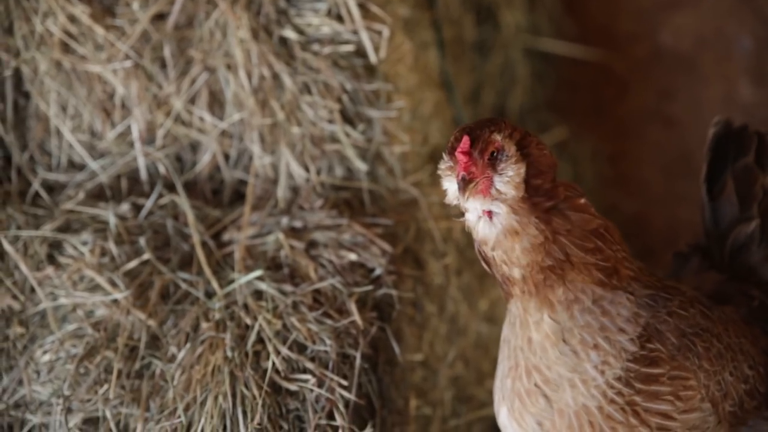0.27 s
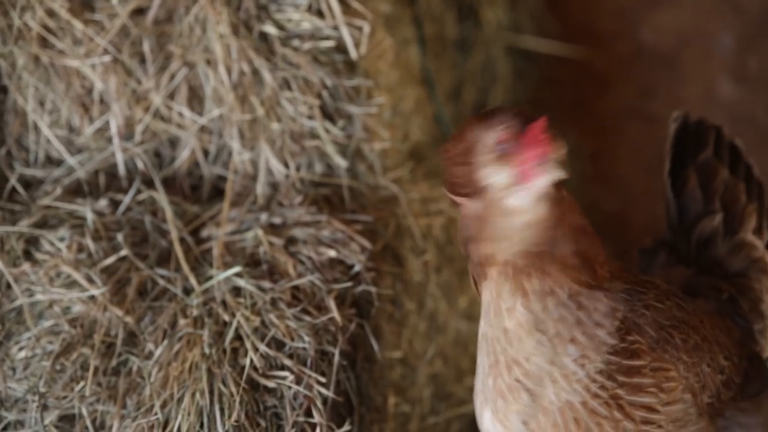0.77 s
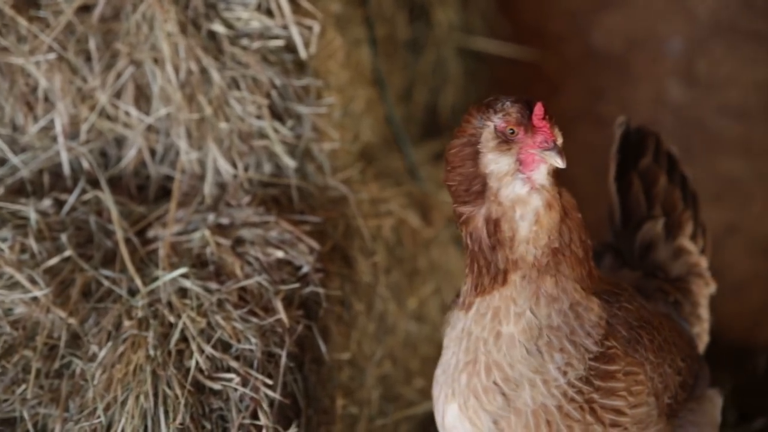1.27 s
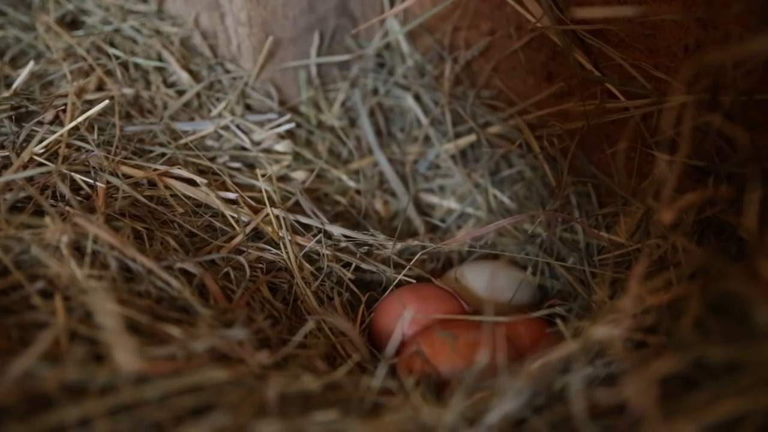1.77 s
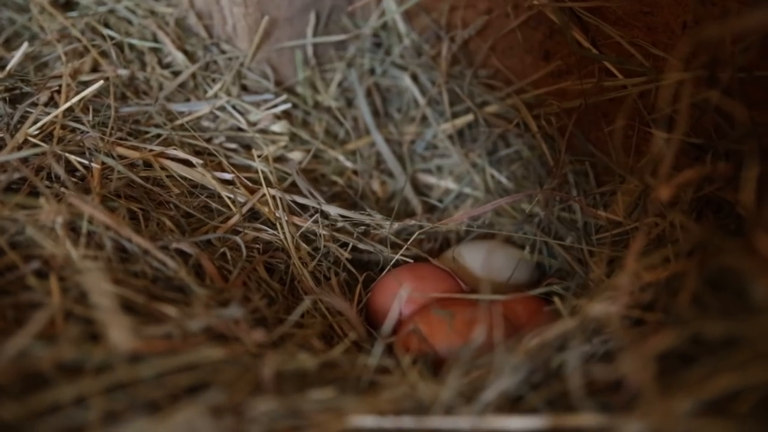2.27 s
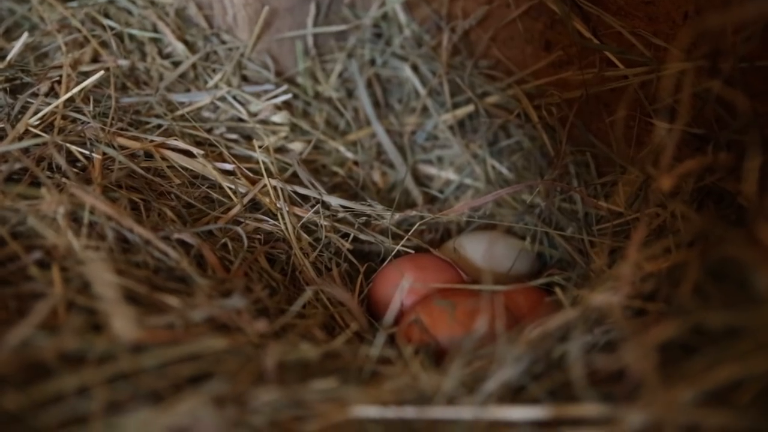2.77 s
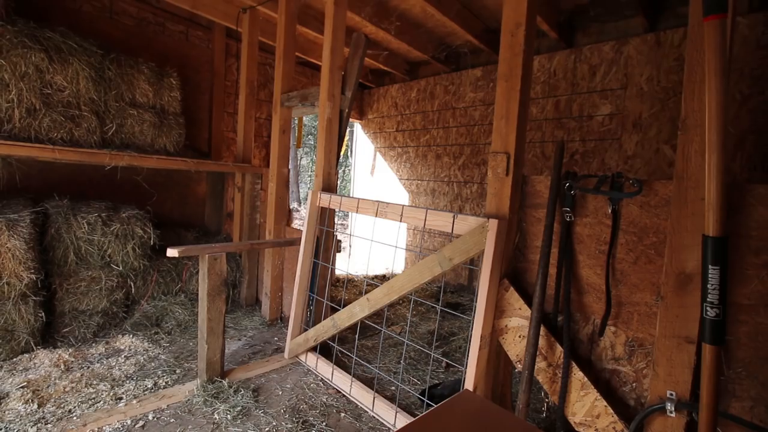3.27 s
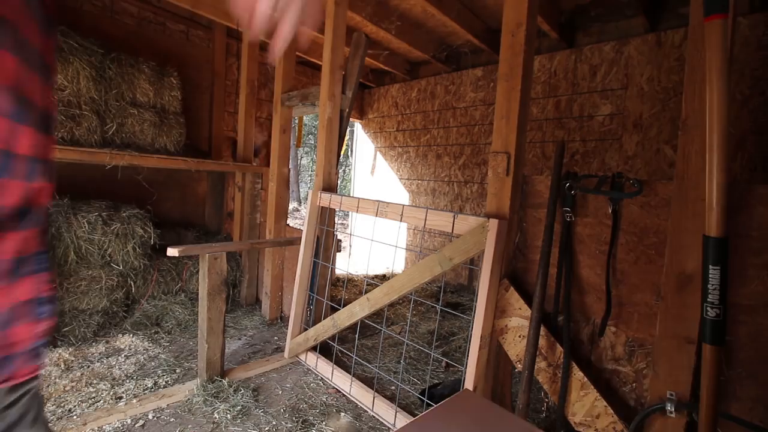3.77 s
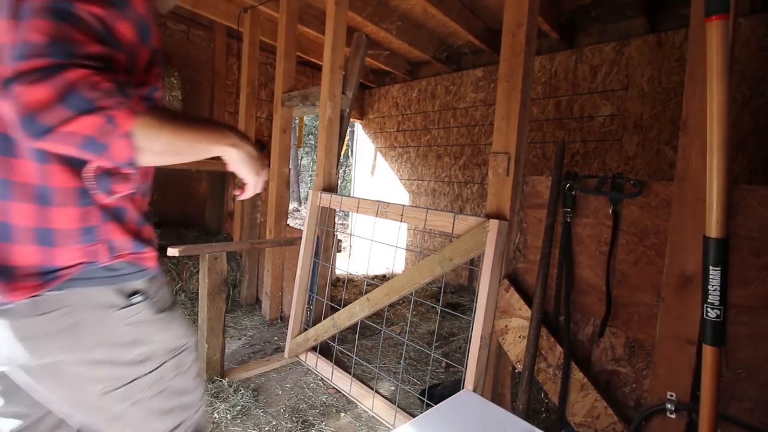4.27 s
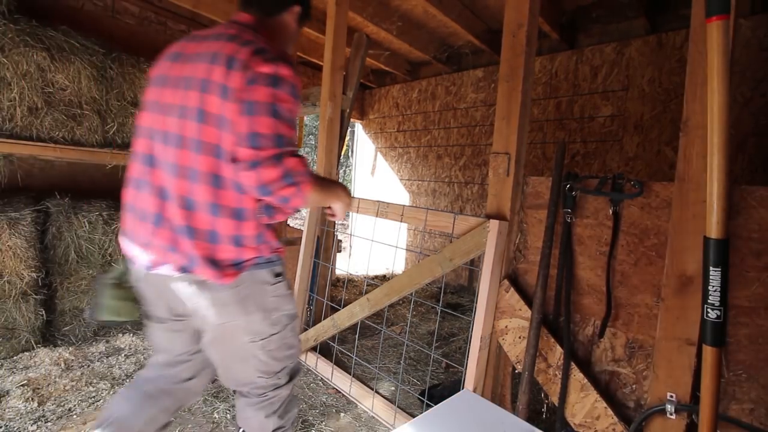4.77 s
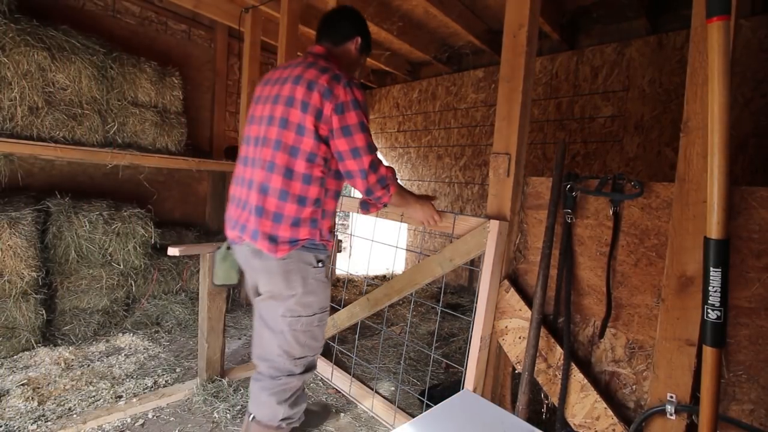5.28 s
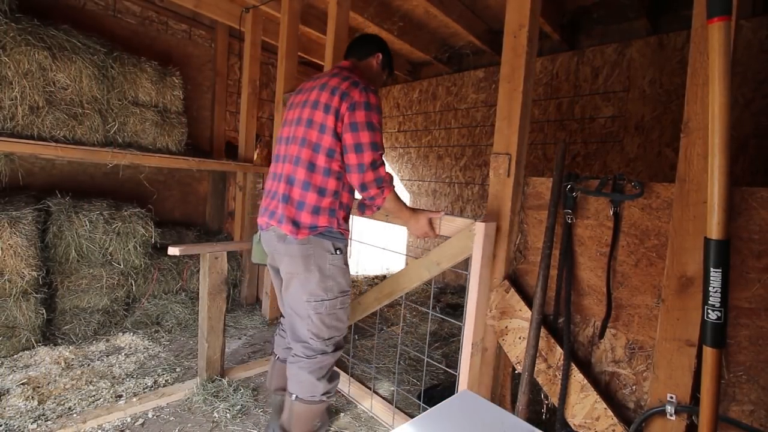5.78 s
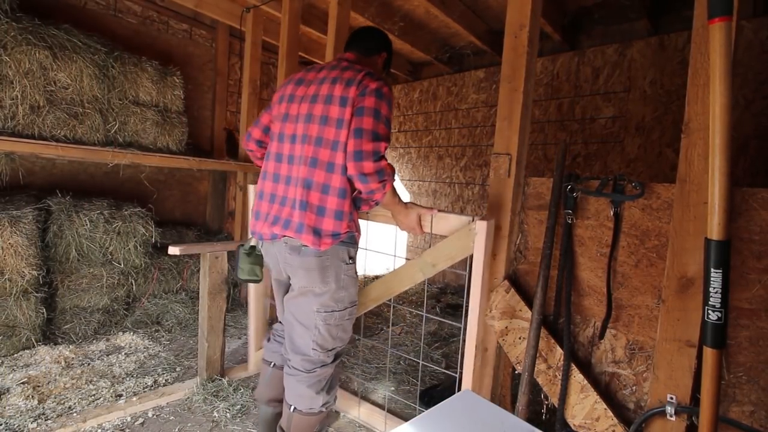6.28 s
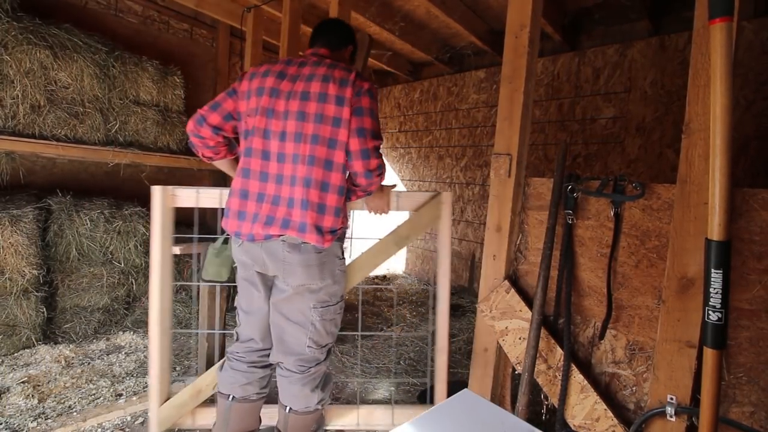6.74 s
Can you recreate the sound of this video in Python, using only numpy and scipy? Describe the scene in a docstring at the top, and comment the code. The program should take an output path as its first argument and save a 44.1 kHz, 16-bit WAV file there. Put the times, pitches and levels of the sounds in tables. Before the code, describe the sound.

A hen clucks softly up close, then after a clatter a hen further off screams and cackles while boots shuffle through straw.

```python
"""A hen close by clucks in a straw nest over a wavering hum; then, after a clatter, a hen further off
in a wooden barn screams and cackles while boots shuffle through straw and a young bird peeps.
A hen's voice is membrane pulses and breath ringing in chest, throat, mouth and windpipe; walls echo it.
Peeps are gliding sines. Clatter and straw are random snaps over hiss; footfalls rumble in the floor."""
import sys
import numpy as np
from scipy import signal
from scipy.fft import rfft, irfft
from scipy.io import wavfile

SR = 44100
rng = np.random.default_rng(int(sys.argv[2]) if len(sys.argv) > 2 else 0)


def materialize(psi):
    """Save the field psi as 16-bit PCM at rate SR to the path in sys.argv[1].

    A 1-D psi becomes a single channel; in a 2-D psi each row is a channel.
    """
    bounded = np.clip(np.atleast_2d(psi).T, -1, 1)
    quanta = np.round(bounded * 32767).astype(np.int16)
    wavfile.write(sys.argv[1], SR, quanta)


N = 308964
LEAD = SR // 5   # run-in samples: a call can start before time zero


def from_db(db):
    return 10 ** (np.asarray(db) / 20)


def rms_one(x):
    return x / np.sqrt(np.mean(x ** 2) + 1e-20)


def lookup(values, index):
    """Linear interpolation at a fractional index."""
    return np.interp(index, np.arange(len(values)), values)


def level_curve_db(rows):
    """Joins (time [s], level [dB]) points; silent outside them."""
    return np.interp(np.arange(N) / SR, *np.transpose(rows), -120, -120)


def drift(rate_hz):
    """Slow random wander, spread about 1."""
    knots = rng.standard_normal(int(N / SR * rate_hz * 2) + 2)
    return lookup(knots, np.linspace(0, len(knots) - 1, N))


def bursts(rows):
    """Envelope of events that swell and die away, straight in dB."""
    t = np.arange(N) / SR
    envelope = np.zeros(N)
    for peak_s, db, rise_s, fall_s in rows:
        away = np.where(t < peak_s, (peak_s - t) / max(rise_s, .002), (t - peak_s) / max(fall_s, .002))
        envelope += from_db(db - 40 * away)
    return envelope


def resonance(x, hz, *widths_hz):
    """Two-pole band-passes in series, one per width; peak gain 1."""
    for width_hz in widths_hz:
        r = np.exp(-np.pi * width_hz / SR)
        poles = [1, -2 * r * np.cos(2 * np.pi * hz / SR), r * r]
        x = signal.lfilter(np.array([1, 0, -1]) * (1 - r * r) / 2, poles, x)
    return x


def coloured(x, spectrum):
    """Shapes x by (frequency [Hz], gain [dB]) points; rms 1."""
    bin_hz = np.arange(1, N // 2 + 2) * SR / N
    hz, db = np.transpose(spectrum)
    gain = from_db(np.interp(np.log(bin_hz), np.log(hz), db))
    return rms_one(irfft(rfft(x) * gain, N))


def band_noise(low_hz, high_hz):
    band = signal.butter(2, [low_hz, high_hz], "band", fs=SR, output="sos")
    return rms_one(signal.sosfilt(band, rng.standard_normal(N)))


def crunch(spectrum, snaps_per_s, spread_db, hiss):
    """Random snaps of uneven size on a bed of hiss."""
    sizes = from_db(spread_db * np.minimum(rng.exponential(1, N), 5)) * rng.choice([-1, 1], N)
    snaps = rms_one(sizes * (rng.random(N) < snaps_per_s / SR))
    return coloured(snaps + hiss * rng.standard_normal(N), spectrum)


def place(sounds):
    """Lays (time [s], sound) pairs on a track that begins LEAD samples early."""
    track = np.zeros(N + LEAD + SR)
    for start_s, sound in sounds:
        i = round(start_s * SR) + LEAD
        track[i:i + len(sound)] += sound
    return track


def room(track, echoes, tail_db, t60_s, cutoff_hz, rings):
    """Direct sound, smeared wall echoes and a tail dulled by wood and straw, and longer plank rings."""
    t = np.arange(SR // 2) / SR
    noise = rng.standard_normal(len(t))
    shapes = [(from_db(-60 * t / t60_s) * np.minimum(t / .01, 1), tail_db)]
    shapes += [(np.exp(-np.abs(t - delay_s) / .004), db) for delay_s, db in echoes]
    response = sum(from_db(db) * noise * shape / np.linalg.norm(shape) for shape, db in shapes)
    response = signal.lfilter(*signal.butter(2, cutoff_hz, fs=SR), response)
    for hz, width_hz, db in rings:
        ring = resonance(noise[::-1], hz, width_hz) * from_db(-40 * t / t60_s) * np.minimum(t / .02, 1)
        response += from_db(db) * np.sqrt(width_hz / 600) * ring / np.linalg.norm(ring)
    response[0] = 1
    return signal.fftconvolve(track, response)[LEAD:LEAD + N]


def membrane(progress, length_s, hz, swell, rough):
    """Voice source and its breath alone; roughness makes the pulses uneven in time and strength."""
    waver, jitter_cycles, breath_share = .06, .15, .16
    uneven_db, crack_db, top_hz = 7, 8, 15500
    timing, wobble = rng.standard_normal((2, 200))
    noise = rng.standard_normal(SR // 4)[:len(progress)]
    t = progress * length_s
    waver_hz = waver * rough ** .5 * np.median(hz) * lookup(wobble, t * 60)
    cycles = np.cumsum(hz + waver_hz) / SR - .1
    strength = from_db(uneven_db * rough * wobble[np.clip(np.round(cycles).astype(int), 0, 199)])
    strength *= from_db(crack_db * rough * lookup(timing[::-1], t * 120))   # breaks up into bursts
    unsettled = rough * (1 + np.exp(-progress / .2))   # takes a few cycles to settle
    cycles += jitter_cycles * unsettled ** 2 * lookup(timing, cycles)
    orders = np.arange(1, int(top_hz / hz.min()))[:, None]
    pulses = rms_one((np.cos(2 * np.pi * orders * cycles) * (orders * hz < top_hz)).sum(0))
    breath = noise * (1 + np.cos(2 * np.pi * cycles))   # air rushes only while the membrane is open
    push = np.interp(progress, *swell) ** 1.6 * strength
    return push * (pulses + breath_share * unsettled * breath), push * breath


def windpipe(source, modes, rough):
    """Upper resonances; the neck is held a little differently for each call."""
    shifts = np.clip(rough * 3, 0, 1) * rng.standard_normal((len(modes), 2)) * [.035, 3]
    sound = np.zeros(len(source))
    for k, ((hz, width_hz, db), (detune, shift_db)) in enumerate(zip(modes, shifts)):
        ring = resonance(source, hz * (1 + detune), width_hz, 2 * width_hz)
        sound += (-1) ** k * from_db(db + shift_db) * ring
    return sound


def hen_call(length_s, pitch, swell, beak, db, rough, mouth_hz, bright_db, pipe, throat,
             mouth_width_hz, chest_hz, chest_db):
    """The membrane rings mouth, throat, chest and windpipe. pitch, swell, beak: (progress, values)."""
    progress = np.linspace(0, 1, round(length_s * SR))
    hz = np.interp(progress, *pitch)
    ring_out = (0, SR // 50)
    source, breath = (np.pad(x, ring_out) for x in membrane(progress, length_s, hz, swell, rough))
    opening = np.pad(np.interp(progress, *beak), ring_out)
    throat_hz, throat_width_hz, throat_db = throat
    mouth = rms_one(resonance(source, mouth_hz, mouth_width_hz, 1.51 * mouth_width_hz))
    hoarse = rms_one(resonance(breath, throat_hz, throat_width_hz, 2 * throat_width_hz))
    hoarse *= 3 * rough * from_db(throat_db)
    chest = from_db(chest_db) * rms_one(resonance(source, max(np.median(hz), chest_hz), 150, 500))
    treble = from_db(bright_db) * rms_one(windpipe(source * opening, pipe, rough))
    return from_db(db) * (mouth + hoarse + chest + treble)


def gesture(onset_strength, peak_share):
    """Swell and beak opening of a short call: treble comes late and goes first."""
    peak_share = np.clip(peak_share, .1, .85)
    swell = [0, peak_share, .88, 1], [onset_strength, 1, .8, 0]
    beak = [0, peak_share, 1], [.4, 1, .3]
    return swell, beak


def near_hen():
    """Clucks whose pulses start slow and speed up; the body thumps along, however bright the call."""
    # (time [s], length [s], final pulse rate [Hz], level [dB], brightness [dB])
    clucks = [ (-.07, 0.051, 399.4, -27, -8), (0.134, 0.041, 402, -23.5, -6), (.352, 0.042, 400.5, -24, -6),
              (.547, 0.046, 390, -24, -7), (0.746, 0.045, 391.6, -22, -7.5), (0.986, .036, 416, -20, -7.5),
              (1.541, 0.04, 251.2, -26, -8.5), (1.765, 0.0379, 234.8, -23, -10.5),
              (1.971, 0.035, 274.2, -22, -9), (2.36, 0.041, 235.7, -27.5, -9.5),
              (2.63, 0.043, 232.6, -26.5, -9), ]
    # windpipe modes: (frequency [Hz], width [Hz], gain [dB])
    modes = [(2100, 400, 1.5), (2877, 270, 14), (4020, 410, -0.5), (4980, 370, 0.5), (6240, 300, -3),
             (7900, 720, -6.5), (13400, 4000, -8)]
    top_hz, top_width_hz, top_db = modes[-1]
    start_hz, throat = 150, (1036, 55, -10.5)   # throat: columns as modes
    swell, beak = gesture(onset_strength=.52, peak_share=.58)
    sounds = []
    for start_s, length_s, end_hz, db, bright_db in clucks:
        body = (380, 464, 4.6 - bright_db)
        top = (top_hz, top_width_hz, top_db + 1.83 * bright_db)
        cluck = hen_call(length_s, ([0, 1], [start_hz, end_hz]), swell, beak, db, rough=.38,
                         mouth_hz=908, bright_db=bright_db, pipe=[body, *modes[:-1], top],
                         throat=throat, mouth_width_hz=282, chest_hz=695, chest_db=-2.5)
        sounds.append((start_s, cluck))
    return place(sounds)


def nest_echo(track):
    """Close walls and a short, dull tail."""
    # echoes (delay [s], gain [dB]), tail [dB], t60 [s], cutoff [Hz],
    # rings (frequency [Hz], width [Hz], relative gain [dB])
    acoustics = ([(.007, 0), (.025, -19.5)], -6, 0.23, 5200, [(754, 43, -16), (1120, 45, -18.5),
                 (945, 920, -29)])
    return room(track, *acoustics)


def nest_air():
    """Low noise with a drifting level."""
    # (frequency [Hz], relative density [dB])
    spectrum = [(12, -75.5), (20, -19), (43, -32.5), (101, -7), (248, -16), (328, -19), (410, -17.5),
                (446, -16.5), (1400, -25), (1710, -23.5), (2260, -35.5), (6180, -54), (11100, -46.5),
                (16000, -57)]
    # (time [s], relative level [dB])
    levels = [(0.0, -48), (1.12, -45), (1.88, -40.5), (2.1, -44), (3.14, -43.5)]
    gain = from_db(level_curve_db(levels) + 2.5 + .4 * drift(1.7))
    return gain * coloured(rng.standard_normal(N), spectrum)


def hum():
    """A low sine wavering in pitch and level."""
    # (time [s], mean level [dB])
    levels = [(0.0, -47), (1.3, -48), (1.56, -40), (1.95, -47), (2.1, -45), (3.14, -40)]
    hz = 93.2 * (1 + .0483 * drift(11))
    return from_db(level_curve_db(levels) + 2.7 * drift(9.6)) * np.sin(2 * np.pi * np.cumsum(hz) / SR)


def stalk_snaps():
    """Each stalk snaps with a short, broad ring."""
    # (time [s], peak [dB], frequency [Hz])
    snaps = [(0.0992, -29.5, 1580), (1.271, -40, 1730), (4.61, -21, 3900), (4.745, -25.5, 9670),
             (6.181, -30, 9600), (6.6896, -27, 9500), (6.995, -32, 9850)]
    sounds = []
    for start_s, db, hz in snaps:
        ring = resonance(signal.unit_impulse(300), hz, .5 * hz)
        sounds.append((start_s, from_db(db) * ring / np.abs(ring).max()))
    return place(sounds)


def clatter():
    """Three crunchy knocks over a low thud."""
    # (time [s], level [dB], 40 dB rise [s], 40 dB fall [s])
    knocks = [(3.192, -16, 0.04, 0.26), (3.304, -18.5, -0.11, 0.03), (3.408, -17, 0.16, 0.1052)]
    # (frequency [Hz], relative density [dB])
    spectrum = [(88, -40), (150, -23), (240, 0.5), (291, -6), (348, -2.5), (1210, -3), (2360, -14.5),
                (5360, -21), (16000, -39.5)]
    # (time [s], level [dB])
    thud = [(3.13, -50), (3.2, -34.5), (3.28, -27), (3.4, -38), (3.43, -47)]
    knocking = bursts(knocks) * crunch(spectrum, snaps_per_s=1500, spread_db=1, hiss=.97)
    return knocking + from_db(level_curve_db(thud)) * band_noise(53, 270)


def barn_air():
    """Midrange noise with a drifting level."""
    # (frequency [Hz], relative density [dB])
    spectrum = [(12, -30), (20, -33.5), (434, 1.5), (923, 6.5), (1760, -13), (2750, -11.5), (5080, -20),
                (7730, -31.5), (13200, -34), (16000, -35)]
    return from_db(-40 + drift(2.1)) * coloured(rng.standard_normal(N), spectrum)


def floor_rumble():
    """Footfalls carried through the floor, over a steady rumble."""
    # (time [s], level [dB])
    footfalls = [(3.8, -39), (3.968, -44), (4.151, -60), (4.8, -50.5), (4.94, -49), (5.3, -44), (5.6, -43),
                 (6.018, -53), (6.53, -45), (6.68, -35), (6.901, -46.5)]
    rise_s, fall_s, steady_db = .19, .19, -56.5
    feet = bursts([(peak_s, db, rise_s, fall_s) for peak_s, db in footfalls])
    return (feet + from_db(steady_db)) * band_noise(21, 184)


def far_hen():
    """Screams and clucks slide up to their pitch and hold it; one squawk is long and clear."""
    # (time [s], length [s], pitch [Hz], level [dB], roughness [0-1], mouth [Hz], brightness [dB])
    calls = [ (3.394, 0.043, 643, -15.5, .25, 1270, -5.5), (3.48, 0.077, 670.6, -19.5, 0.41, 1274, -9.5),
             (3.564, 0.078, 679.5, -21, 0.34, 1300, -5), (3.679, 0.051, 690.3, -19, 0.37, 1274, -5.5),
             (3.808, 0.086, 675, -18.5, 0.32, 1317, -6.5), (3.928, 0.043, 690, -30.5, 0.32, 1390, -10),
             (3.987, 0.05, 565, -18, 0.36, 986, -10.5), (4.153, 0.046, 534.5, -18.5, 0.41, 973, -13),
             (4.326, 0.047, 467.5, -21, 0.29, 1000, -10.5), (4.491, 0.064, 410.8, -26.5, 0.45, 986, -13),
             (4.682, 0.07, 382.5, -26, 0.35, 945, -18), (4.851, 0.054, 387.6, -23.5, 0.34, 943, -12),
             (5.017, 0.047, 424.4, -18.5, 0.35, 817, -21), (5.189, 0.0525, 419.2, -20, 0.41, 855, -18),
             (5.37, 0.0438, 395, -22, 0.57, 810, -23), (5.524, 0.049, 444.7, -18.5, 0.4, 825, -16),
             (5.622, 0.059, 492.6, -16, 0.22, 1010, -6), (6.013, 0.053, 427.6, -19, 0.42, 890, -12),
             (6.191, 0.059, 411.8, -23, 0.33, 946, -10.5), (6.408, 0.052, 372.8, -23, 0.44, 856, -12.5),
             (6.647, 0.043, 379.2, -20.5, 0.36, 890, -13.5), (6.836, 0.052, 349.4, -20, 0.41, 886, -14), ]
    # (time [s], pitch [Hz], strength [0-1], beak opening [0-1])
    squawk_path = [(5.71, 470, .3, .8), (5.72, 530, .95, .95), (5.735, 508, .75, .65), (5.75, 503, .6, .6),
                   (5.84, 503, .75, .65), (5.856, 520, .85, .8), (5.878, 535, .1, .1)]
    # windpipe modes: (frequency [Hz], width [Hz], gain [dB])
    scream_pipe = [(1890, 260, 0.5), (2720, 290, 5.5), (3520, 380, -1.5), (4370, 900, -8), (6030, 980, -14),
                   (8200, 2500, -21.5), (12100, 6000, -41)]   # neck stretched
    cluck_pipe = [(250, 410, -16), (1990, 590, 10.5), (2630, 400, 14.5), (3500, 495, 17), (4360, 400, 10),
                  (5740, 1360, 0.5), (8300, 1700, -5), (12000, 12000, -20.5)]
    squawk_pipe = [(1544, 170, 4), (2080, 490, 1), (2475, 330, 4), (3720, 310, 0), (4410, 310, -1.5),
                   (5000, 720, -4), (6420, 450, -8.5), (8400, 1300, -14), (12500, 4500, -28)]
    scream_above_hz, throat = 600, (1093, 96, -14)   # throat: columns as modes
    sounds = []
    for start_s, length_s, hz, *voice in calls:
        if hz > scream_above_hz:
            attack_s, arch, pipe = .011, [.9, .97, 1.03, .931], scream_pipe
        else:
            attack_s, arch, pipe = .019, [.82, .99, 1.02, .973], cluck_pipe
        pitch = [0, .3, .7, 1], hz * np.array(arch)
        swell, beak = gesture(onset_strength=.28, peak_share=attack_s / length_s)
        cry = hen_call(length_s, pitch, swell, beak, *voice, pipe, throat,
                       mouth_width_hz=204, chest_hz=345, chest_db=-8.5)
        sounds.append((start_s, cry))
    times_s, hz, strength, opening = np.transpose(squawk_path)
    length_s = times_s[-1] - times_s[0]
    progress = (times_s - times_s[0]) / length_s
    squawk = hen_call(length_s, (progress, hz), (progress, strength), (progress, opening), db=-20,
                      rough=.001, mouth_hz=1000, bright_db=-4.5, pipe=squawk_pipe, throat=throat,
                      mouth_width_hz=320, chest_hz=345, chest_db=-5.5)
    return place(sounds + [(times_s[0], squawk)])


def barn_echo(track):
    """Wooden walls, a longer tail and one plank ring."""
    # echoes (delay [s], gain [dB]), tail [dB], t60 [s], cutoff [Hz],
    # rings (frequency [Hz], width [Hz], relative gain [dB])
    acoustics = ([(.008, -4.5), (.04, -14.5)], -7, 0.32, 5300, [(1088, 340, -16.5)])
    return room(track, *acoustics)


def young_bird():
    """Each peep is a sine that glides and trembles."""
    # (time [s], length [s], start pitch [Hz], end pitch [Hz], peak [dB])
    peeps = [(4.089, 0.072, 2800, 2810, -32), (4.272, 0.024, 2680, 2760, -37.5),
             (4.538, 0.076, 2720, 2690, -37.5), (4.738, 0.049, 2900, 2830, -28)]
    sounds = []
    for start_s, length_s, start_hz, end_hz, db in peeps:
        n = round(length_s * SR)
        tremble = lookup(rng.standard_normal(40), 150 * np.arange(n) / SR)
        hz = np.linspace(start_hz, end_hz, n) * (1 + .015 * tremble)
        sounds.append((start_s, from_db(db) * np.hanning(n) * np.sin(2 * np.pi * np.cumsum(hz) / SR)))
    return place(sounds)


def boots_in_straw():
    """Each scuff is a swell of dense snaps and hiss."""
    # (time [s], level [dB], 40 dB rise [s], 40 dB fall [s])
    scuffs = [(4.622, -37, 0.16, 1.07), (5.05, -34.5, 0.12, 0.08), (5.312, -21.5, 0.1759, 0.26),
              (6.30, -39.5, 0.64, 0.9), (6.495, -26, 0.02, 0.16), (6.70, -32.5, .5, 0), (6.80, -44, 0.7, 1)]
    # (frequency [Hz], relative density [dB])
    spectrum = [(120, -55), (200, -8), (500, 3), (749, 1), (821, -5), (2420, -8), (3690, -2), (3970, -7),
                (16000, -22.5)]
    return bursts(scuffs) * crunch(spectrum, snaps_per_s=2500, spread_db=3, hiss=1.2)


def scene():
    """The nest, then the barn; mono."""
    barn_start_s = 3.133
    distant = far_hen() + young_bird() + stalk_snaps()
    events = clatter() + boots_in_straw() + nest_echo(near_hen()) + barn_echo(distant)
    in_nest = np.arange(N) < barn_start_s * SR
    background = np.where(in_nest, nest_air() + hum(), barn_air() + floor_rumble())
    return (events + background)[None]


def record(dry):
    """Rounds the peaks and cuts the top."""
    ceiling, cutoff_hz = 1.6, 16400
    lowpass = signal.cheby2(20, 70, cutoff_hz, fs=SR, output="sos")
    return signal.sosfilt(lowpass, ceiling * np.tanh(dry / ceiling))


dry = scene()
out = record(dry)
materialize(out)
```